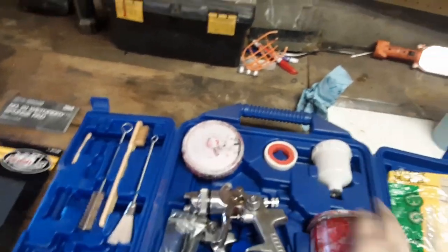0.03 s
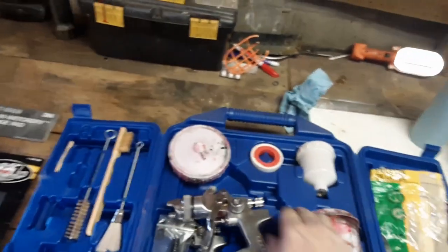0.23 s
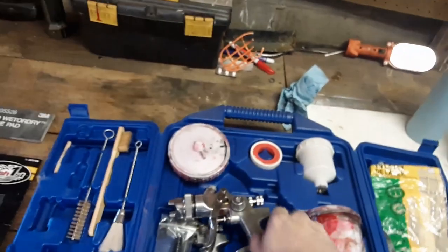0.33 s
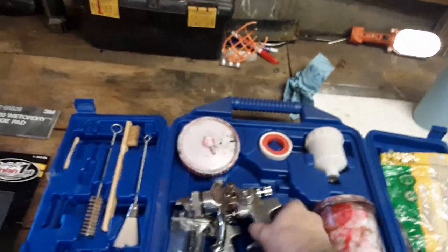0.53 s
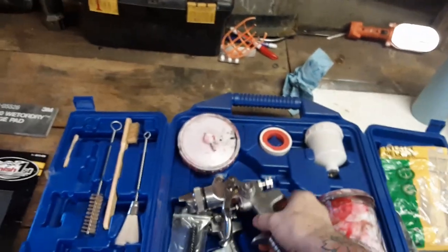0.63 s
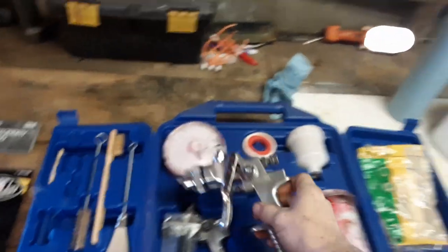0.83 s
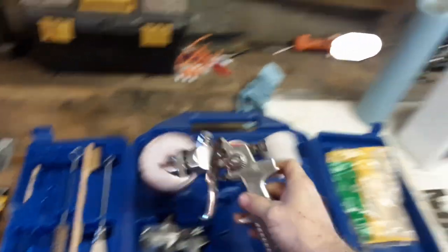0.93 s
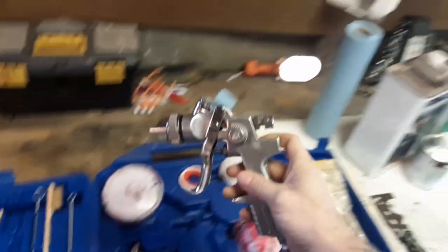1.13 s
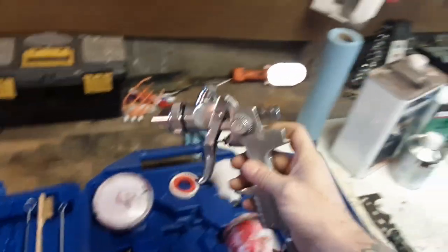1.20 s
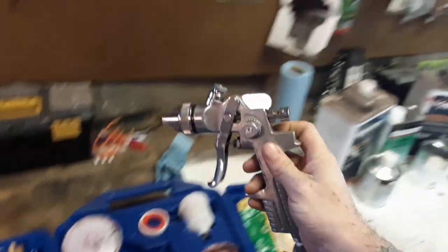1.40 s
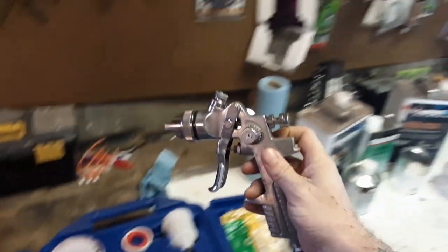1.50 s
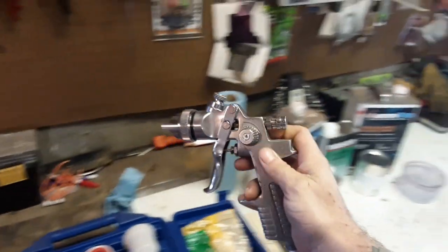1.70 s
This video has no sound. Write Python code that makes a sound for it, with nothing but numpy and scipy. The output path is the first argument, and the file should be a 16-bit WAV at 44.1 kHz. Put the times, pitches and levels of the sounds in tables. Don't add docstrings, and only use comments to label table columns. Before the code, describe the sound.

A metal spray gun clatters and knocks out of a hollow plastic case, then near quiet.

```python
import sys
import numpy as np
from scipy import signal
from scipy.fft import rfft, irfft, next_fast_len
from scipy.io import wavfile
from scipy.ndimage import uniform_filter1d

SR = 44100
rng = np.random.default_rng(int(sys.argv[2]) if len(sys.argv) > 2 else 0)


def pcm_store(signal):
    levels = np.round(np.clip(np.atleast_2d(signal), -1, 1) * 32767)
    wavfile.write(sys.argv[1], SR, levels.astype(np.int16).T)


def level_to_linear(level):
    exponent = np.asarray(level, float) / 20
    return 10 ** exponent


N = 77175

# [f/Hz, level/dB per Hz]
AIR_SPECTRUM = [(15, -48), (25, -22), (309, -2.5), (1020, -25.5), (1560, -24.5), (1840, -20.5),
                (2910, -40.5), (6210, -35), (16000, -43)]
# [mean f/Hz, mean level/dB rms]
HUM_LINES = [(193.8, -70), (226.1, -63.5), (291, -62), (699.8, -76)]
# [t/s, f/Hz, level/dB rms]
MOTOR_TONE = [
    (0.95, 124.7, -66.5),
    (1.049, 119.5, -60.5),
    (1.301, 120.8, -56),
    (1.499, 119, -59),
    (1.58, 121.7, -73.5),
    (1.699, 122.2, -65),
]
# [f/Hz, level/dB]
NEAR_WIDTH = [(250, -29.5), (500, -16), (1000, -4.5), (4000, 0.5), (9000, -1), (13000, 0)]
AIR_WIDTH = [(130, -6.5), (400, -5), (1200, 0.5)]
# [t/s, level/dB, brightness/dB: lifts the top band, lowers the low band]
SCRAPE_PATH = [(0, -53, 3.5), (.07, -52.5, 2.5), (.13, -63, -1), (.165, -66, -11.5), (0.178, -56.5, 0),
               (0.247, -45, -3.5), (0.291, -56, 0.5), (.33, -43, -8.5), (.39, -41.5, -1.5),
               (0.437, -43.5, -0.5), (.455, -58.5, -4.5), (0.508, -59, -7), (.535, -43, -1.5),
               (.62, -42, -3), (.70, -43.5, -5.5), (0.764, -41.5, -7), (0.789, -57.5, -7),
               (0.901, -70.5, -4.5)]
# [f/Hz, level/dB per Hz]
SLIDE_SPECTRUM = [(59, -33), (100, -10.5), (365, -3.5), (634, -10.5), (2170, -14.5), (6150, -24),
                  (7140, -18), (8110, -27.5), (16000, -26.5)]
# [t/s, peak level/dB, struck spot f/Hz, contact/ms]
KNOCKS = [(0.073, -33.5, 265, 0.4), (0.17, -24, 198, 0.75), (.184, -18, 1050, 0.22),
          (0.1993, -12, 1070, 0.36), (0.215, -17.5, 340, 1), (0.234, -19.5, 398, 0.17),
          (0.241, -22, 380, 0.13), (.26, -35, 455, .3), (0.303, -7, 1530, 0.18), (.305, -3.5, 990, 0.69),
          (.31, -20, 378, 0.76), (.327, -12.5, 246, 0.21), (.341, -11, 339, 0.35), (.36, -14.5, 328, 0.37),
          (.372, -12, 1120, 0.11), (0.382, -13.5, 858, .5), (0.421, -31, 385, 0.68),
          (0.516, -21.5, 470, 0.4), (0.5432, 0.5, 820, 0.6), (0.554, -9.5, 247, 0.5),
          (0.572, -11.5, 810, 0.09), (0.618, -30.5, 560, 0.29), (.645, -9.5, 350, 0.22),
          (.668, -7, 790, 0.45), (0.68, -11.5, 205, 0.33), (.727, -17.5, 534, 0.25),
          (0.741, -11.5, 312, 0.32), (.75, -14, 1050, 0.39), (.761, -14, 369, 0.42)]
# [f/Hz, level/dB, t60/s]
SHELL_MODES = [(116.2, -8.5, .09), (205, -9.5, .07), (241.3, 2, 0.098), (333, 7, 0.018), (357, -3, 0.19),
               (470, -6, 0.12), (516, 0.5, 0.08), (666, -7.5, 0.083), (762, 0, 0.048), (933, 5.5, 0.01),
               (1070, 1, 0.039), (1203, 0.5, 0.024), (1695, 3, 0.026), (1968, 0, 0.047)]
# [t/s, peak level/dB, f/Hz, t60/s]
PANEL_NOTES = [(.082, -44.5, 455, 0.04), (.185, -32, 2100, 0.034), (.187, -29, 700, 0.053),
               (.2005, -24.5, 1045, 0.041), (.206, -32.5, 1930, 0.032), (.216, -23, 384, 0.062),
               (.236, -22, 470, 0.023), (.2395, -28.5, 1985, 0.038), (.243, -24, 372, 0.039),
               (.258, -41.5, 2200, 0.075), (.293, -35.5, 298, 0.033), (0.303, -15, 1600, 0.023),
               (.303, -17, 800, 0.03), (.305, -11, 1068, 0.026), (.309, -18, 780, 0.022),
               (.329, -24.5, 830, .04), (0.364, -26, 110.5, 0.11), (0.488, -40.5, 121, .1),
               (.524, -30.5, 728, 0.065), (.528, -28.5, 447, 0.023), (0.5441, -8, 916, 0.021),
               (.545, -12, 525, 0.058), (.554, -15.5, 252.4, 0.12), (0.562, -16, 468, 0.023),
               (.573, -20, 2330, 0.023), (0.576, -18.5, 1060, 0.015), (.578, -16.5, 410, 0.017),
               (.596, -28.5, 313, 0.036), (0.65, -17.5, 311, 0.05), (.65, -21, 730, .03),
               (.668, -17.5, 550, 0.036), (.669, -20, 1010, 0.054), (.679, -18, 324, 0.044),
               (0.681, -32.5, 2400, 0.054), (.728, -16.5, 532, 0.064), (0.729, -22.5, 1745, 0.02),
               (.729, -23.5, 1028, 0.042), (.739, -16.5, 332, 0.042), (.748, -25, 2010, 0.019),
               (0.754, -27, 1770, 0.026), (.757, -16.5, 330, 0.029), (.775, -27.5, 281, 0.052),
               (0.644, -23, 168, 0.1)]
# [t/s, peak level/dB, ring f/Hz, length/ms]
CLINKS = [(0.183, -37.5, 5560, 2.6), (0.234, -33, 5340, 26), (0.3013, -5.5, 2957, 3.1),
          (0.3506, -21.5, 7500, 2), (.361, -12, 3940, 4.4), (0.367, -14.5, 5920, 4),
          (0.374, -23, 3810, 7.3), (0.427, -21.5, 6850, 3.1), (0.5318, -25, 6460, 1.8),
          (0.5726, -12, 6730, 2.7), (0.6185, -18, 3040, 1.7), (0.647, -9.5, 8800, 4.4),
          (0.6488, -10, 15270, 5.3), (0.651, -9.5, 6220, 5.7), (0.7273, -18, 3930, 3.2),
          (0.744, -26, 5720, 9.1), (0.75, -15, 3000, 3.5), (1.312, -46.5, 10270, 5.3),
          (0.3015, -11.5, 7630, 4.1), (.303, -28, 8850, 3.3), (0.312, -31, 4860, 22), (.383, -29, 5800, 8),
          (.395, -26.5, 4560, 28), (0.654, -21.5, 14530, 5.1), (1.122, -52, 6980, 5.7),
          (1.127, -51.5, 4110, 4.1), (0.573, -19, 3600, 2.8), (0.644, -19, 2500, 5.8)]
SQUEAK_HARMONICS_DB = [-58.5, -40, -34.5]
RUSTLE_STARTS_S = [1.06, 1.112, 1.07, 1.265, 1.54, 1.54, 1.45, .945, 1.39, 1.542]
# [length/s, level/dB, centre f/Hz, spread/octaves]
RUSTLES = [
    (0.088, -65.5, 6840, 0.15),
    (0.029, -60, 2020, 0.29),
    (0.11, -70, 4340, 0.36),
    (0.072, -66.5, 8800, 0.48),
    (0.096, -68.5, 4650, 0.32),
    (0.044, -63, 1720, 0.36),
    (0.26, -85, 4100, 0.21),
    (0.044, -71.5, 6700, 0.68),
    (0.027, -74, 11400, 0.31),
    (0.043, -67, 6830, .15),
]

AIR_DB, THROB_HZ, THROB_PER_S, THROB_DB = -58, 55, 10.2, -76.5
GRIT_PER_S, GRIT_DB, RUMBLE_DB = 2300, 6, 1.5
KNOCK_LAG_S, KNOCK_DB, SPOT_DB, SPOT_OCT, SCATTER_DB = .0012, -2, 9, 0.36, 1.5
RATTLE_HZ, RATTLE_S, RATTLE_DB = 3000, 0.026, -24
PANEL_RISE_CYCLES = 0.36
CLINK_DB, CHATTER_PER_S, SPOT_RING_DB = -5, 5100, 10
CRACK_DB, CRACK_OCT, CRACK_NARROWING, SKIRT_DB, SKIRT_DB_PER_OCT = -3.5, 0.46, 0.92, -13, -5
GUN_LOW_HZ, GUN_T60_S = 2340, 0.019
SQUEAK_S, SQUEAK_LEN_S, SQUEAK_HZ = .384, .016, 3170
ROOM_T60_S, ROOM_TOP_T60_S, ROOM_DB = .45, .36, -19
LOW_CUT_HZ, LEFT_SHARE = 82, .1
PORT_HZ, PORT_WIDTH_HZ, PORT_DB, TOP_HZ = 15410, 320, 3, 15650


def times():
    return np.arange(N) / SR


def read(table, hz):
    table = np.array(table)
    return np.interp(np.log(np.maximum(hz, 1)), np.log(table[:, 0]), table[:, 1])


def colour(x, gain):
    size = next_fast_len(N + SR // 4)
    hz = np.arange(size // 2 + 1) * SR / size
    return irfft(rfft(x, size) * gain(hz), size)[..., :N]


def level(x, db):
    return x * level_to_linear(db) / np.sqrt(np.mean(x ** 2))


def walk(rate_hz):
    k = int(SR / rate_hz)
    steps = np.repeat(rng.standard_normal(N // k + 1), k)
    return 1.5 * uniform_filter1d(uniform_filter1d(steps, k), k)[:N]


def ring(modes, gains, detune, size=9000):
    t = np.arange(size) / SR
    hz, db, t60 = np.array(modes).T[:, :, None]
    tones = np.sin(2 * np.pi * hz * detune[:, None] * t)
    return (level_to_linear(db) * gains[:, None] * tones * 1000. ** (-t / t60)).sum(axis=0)


def add(track, s, sound):
    i = int(s * SR)
    track[i:i + len(sound)] += sound[:N - i]


def grit(per_s, spread_db, size):
    u, e, sign = rng.random((3, size))
    strength = level_to_linear(np.minimum(-spread_db * np.log(e + 1e-9), 12))
    return (u < per_s / SR) * strength * np.sign(sign - .5)


def ports(mid, width, other):
    side = LEFT_SHARE * mid + colour(other, lambda hz: level_to_linear(read(width, hz)))
    return np.array([mid + side, mid - side])


def tone(hz, db):
    return np.sqrt(2) * level_to_linear(db) * np.sin(2 * np.pi * np.cumsum(hz) / SR)


def workshop():
    noise = colour(rng.standard_normal((2, N)), lambda hz: level_to_linear(read(AIR_SPECTRUM, hz)))
    air, t = 0, times()
    for centre_hz in 30 * 2 ** np.arange(0, 9.5, .5):
        band = colour(noise, lambda hz: np.clip(1 - np.abs(2 * np.log2(hz / centre_hz + 1e-6)), 0, 1))
        air = air + band * level_to_linear(1.3 * walk(21))
    air = level(air, AIR_DB)
    hum = sum(tone(hz * (1 + 0.004 * walk(4.7)), db + 1.8 * walk(15)) for hz, db in HUM_LINES)
    s, hz, db = np.array(MOTOR_TONE).T
    hum = hum + tone(np.interp(t, s, hz), np.interp(t, s, db) + 1.6 * walk(2.7))
    hum = hum + tone(THROB_HZ + 0 * t, THROB_DB) * np.cos(np.pi * THROB_PER_S * (t - .03))
    return ports(air[0], AIR_WIDTH, air[1]) + hum


def scrape():
    s, db, tilt = np.array(SCRAPE_PATH).T
    t = times()
    rough = level(grit(GRIT_PER_S, GRIT_DB, N), 1.1) + rng.standard_normal(N)
    rough = colour(rough, lambda hz: level_to_linear(read(SLIDE_SPECTRUM, hz)))
    low = colour(rough, lambda hz: 1 / (1 + (hz / 2200) ** 4))
    mid = colour(rough - low, lambda hz: 1 / (1 + (hz / 8000) ** 4))
    top = rough - low - mid
    unit = np.std(rough - low)
    tilt = np.interp(t, s, tilt)
    mix = level_to_linear(RUMBLE_DB - 1.1 * tilt + 2.0 * walk(40)) * low
    mix = mix + level_to_linear(2.3 * walk(60)) * mid
    mix = mix + level_to_linear(tilt + 1.7 * walk(37)) * top
    return mix / unit * level_to_linear(np.interp(t, s, db, right=-120))


def knocks():
    out, t = np.zeros(N), np.arange(9000) / SR
    mode_hz = np.array(SHELL_MODES)[:, 0]
    chance = rng.standard_normal((len(KNOCKS), 2, len(SHELL_MODES)))
    rattle_band = signal.butter(2, [900, RATTLE_HZ], "band", fs=SR, output="sos")
    for (s, db, spot_hz, contact_ms), (g, d) in zip(KNOCKS, chance):
        near_db = SPOT_DB * np.exp(-.5 * (np.log2(mode_hz / spot_hz) / SPOT_OCT) ** 2)
        body = ring(SHELL_MODES, level_to_linear(near_db + SCATTER_DB * g) * np.sign(d), 1 + 0.034 * d)
        push = t[:300] * np.exp(-t[:300] * 6000 / max(contact_ms, .05))
        body = np.convolve(body / np.abs(body).max(), push / push.sum())[:9000]
        loose = signal.sosfilt(rattle_band, rng.standard_normal(9000)) * np.exp(-t / RATTLE_S)
        add(out, s + KNOCK_LAG_S, (body + level_to_linear(RATTLE_DB) * loose) * level_to_linear(db + KNOCK_DB))
    return out


def panels():
    out, t = np.zeros(N), np.arange(9000) / SR
    for s, db, hz, t60 in PANEL_NOTES:
        rise = 1 - np.exp(-t * hz / PANEL_RISE_CYCLES)
        note = np.sin(2 * np.pi * hz * t) * rise * 1000. ** (-t / max(t60, .005))
        add(out, s, note * level_to_linear(db) / np.abs(note).max())
    return out


def clinks():
    size = 2500
    out, t = np.zeros(N), np.arange(size) / SR
    bin_hz = np.fft.rfftfreq(size, 1 / SR) + 1
    gun_hz = GUN_LOW_HZ * (16000 / GUN_LOW_HZ) ** rng.random(50) ** 0.56
    for s, db, hz, ms in CLINKS:
        g, d = rng.standard_normal((2, 51))
        u = t * 1000 / max(ms, .3)
        fade = (np.exp(-u ** 2 / 2) + .25 * np.exp(-u / 3)) * np.minimum(t / .0008, 1)
        octs = CRACK_OCT * (5000 / hz) ** CRACK_NARROWING

        def near_db(f):
            skirt = SKIRT_DB + SKIRT_DB_PER_OCT * np.log2(f / 5000)
            return np.maximum(-6 * (np.log2(f / hz) / octs) ** 2, skirt)

        modes = [(f, near_db(f), GUN_T60_S) for f in gun_hz] + [(hz, SPOT_RING_DB, .022)]
        struck = ring(modes, level_to_linear(g), 1 + 0.0033 * d, size=1500)
        rung = signal.fftconvolve(struck, grit(CHATTER_PER_S, 0.89, size) * fade)[:size]
        rung = rung / (np.abs(rung).max() + 1e-9)
        crack_gain = level_to_linear(near_db(bin_hz)) * (bin_hz / (bin_hz + 2000)) ** 2
        crack = irfft(rfft(rng.standard_normal(size)) * crack_gain) * fade
        crack = crack / np.abs(crack).max()
        add(out, s, (rung + level_to_linear(CRACK_DB) * crack) * level_to_linear(db + CLINK_DB))
    return out


def squeak():
    u = (times() - SQUEAK_S) / SQUEAK_LEN_S
    hz = SQUEAK_HZ * (1 - 0.017 * np.exp(-np.maximum(u, 0) / .15) + .004 * walk(280))
    phase = 2 * np.pi * np.cumsum(hz) / SR
    shape = np.clip(u / 0.17, 0, 1) * np.clip((1.3 - u) / 1.2, 0, 1)
    return shape * sum(level_to_linear(db) * np.sin((k + 2) * phase) for k, db in enumerate(SQUEAK_HARMONICS_DB))


def rustles():
    out, t = 0, times()
    for s, (length_s, db, hz, octs) in zip(RUSTLE_STARTS_S, RUSTLES):
        u = (t - s) / length_s
        shape = np.clip(u / 0.18, 0, 1) * np.exp(-np.maximum(u - .7, 0) / 0.49)
        grain = rng.standard_normal(N) * level_to_linear(1.85 * walk(270))
        grain = colour(grain, lambda f: np.exp(-.5 * (np.log2(f / hz + 1e-6) / octs) ** 2))
        out = out + shape * level(grain, db)
    return out


def room(x):
    t = np.arange(22000)[None] / SR
    low, high = rng.standard_normal((2, 2, 22000))
    low = uniform_filter1d(low, size=9) * 1000. ** (-t / ROOM_T60_S) * 2
    high = uniform_filter1d(high, size=3) * 1000. ** (-t / ROOM_TOP_T60_S) * 2
    tail = (low + high) * np.clip(t / .012, 0, 1)
    tail = tail / np.sqrt((tail ** 2).sum(axis=1, keepdims=True))
    return signal.fftconvolve(x[None], tail, axes=1)[:, :N]


def scene():
    near = scrape() + knocks() + panels() + clinks() + squeak() + rustles()
    near = signal.sosfilt(signal.butter(3, LOW_CUT_HZ, "high", fs=SR, output="sos"), near)
    early = rng.standard_normal(600) * np.exp(-np.arange(600) / SR / 0.009)
    early = irfft(np.exp(1j * np.angle(rfft(early))))
    heard = ports(near, NEAR_WIDTH, signal.fftconvolve(near, early)[:N])
    tail = room(near)
    return heard + level_to_linear(ROOM_DB) * ports(tail[0], NEAR_WIDTH, tail[1]) + workshop()


def top_cut(x):
    return signal.sosfilt(signal.butter(12, 16790, fs=SR, output="sos"), x)


def record(dry):
    x = colour(dry, lambda hz: level_to_linear(PORT_DB * np.exp(-.5 * ((hz - PORT_HZ) / PORT_WIDTH_HZ) ** 2)))
    x = signal.sosfilt(signal.cheby1(12, .5, TOP_HZ, fs=SR, output="sos"), x)
    return top_cut(x)


dry = scene()
out = record(dry)
pcm_store(out)
```